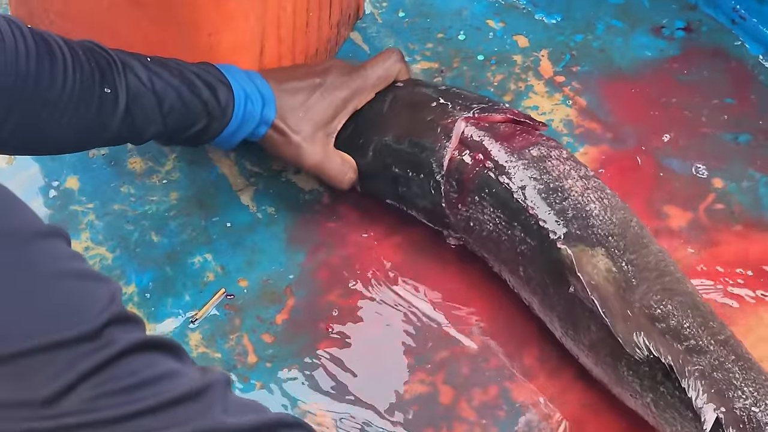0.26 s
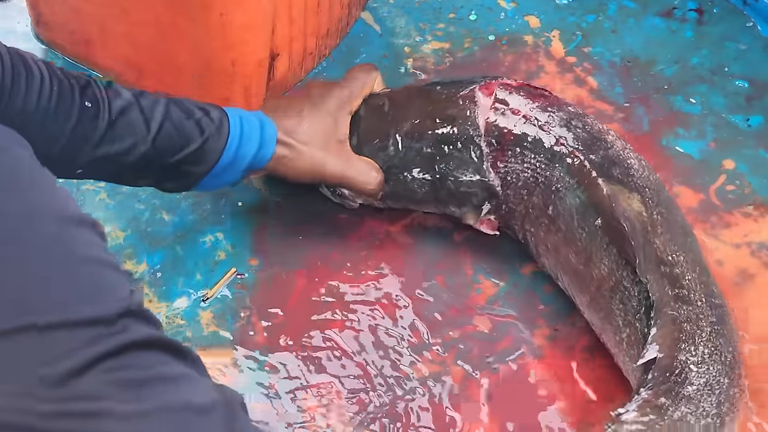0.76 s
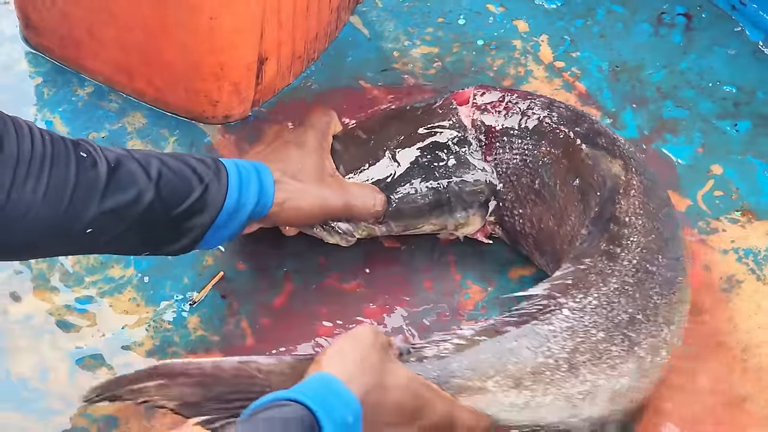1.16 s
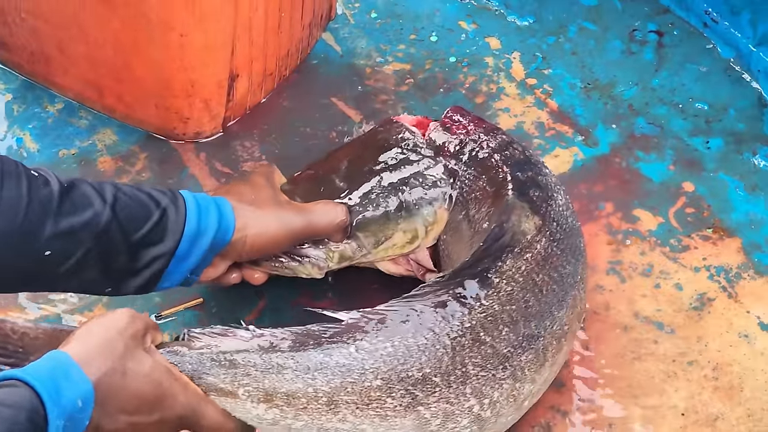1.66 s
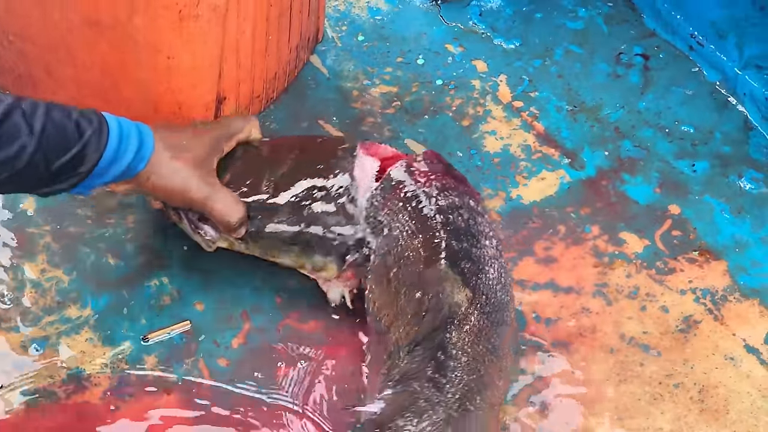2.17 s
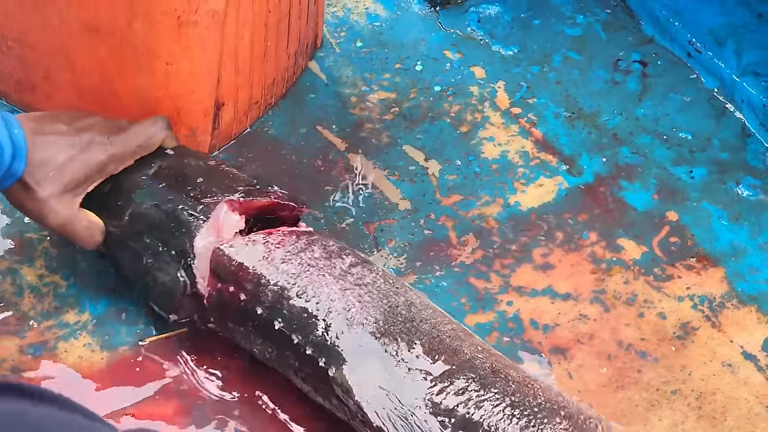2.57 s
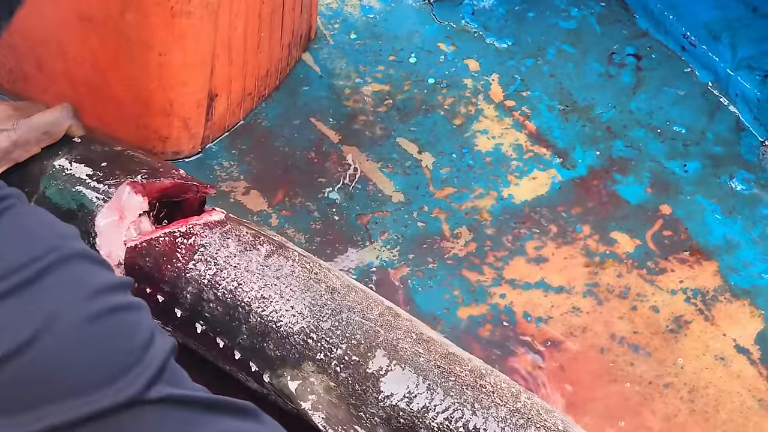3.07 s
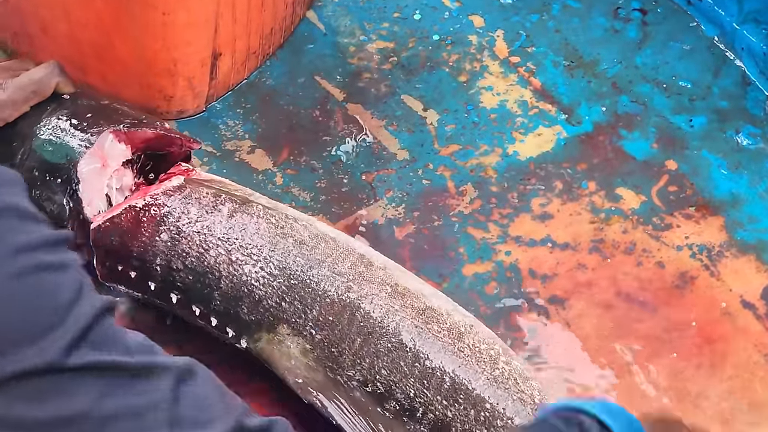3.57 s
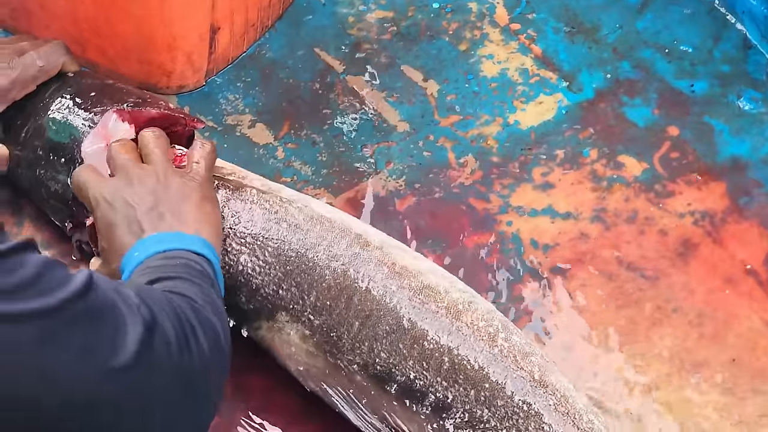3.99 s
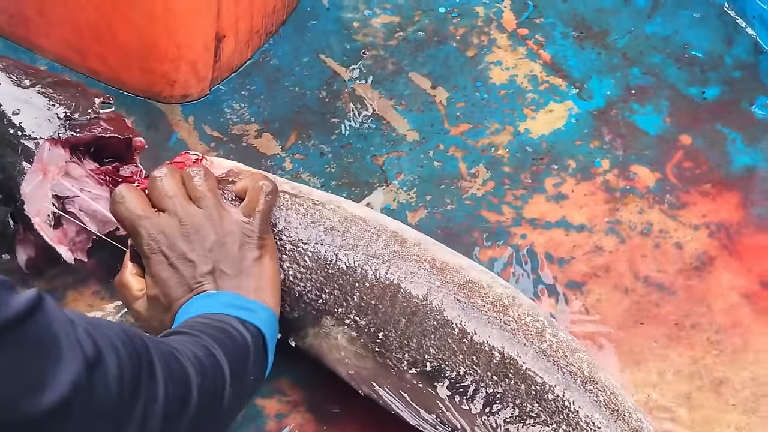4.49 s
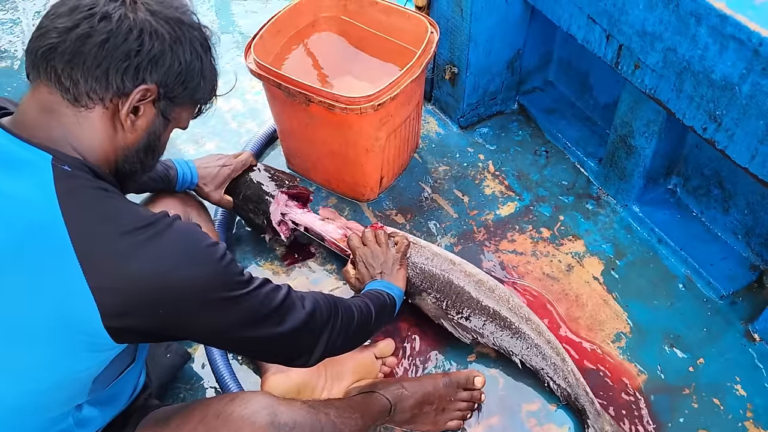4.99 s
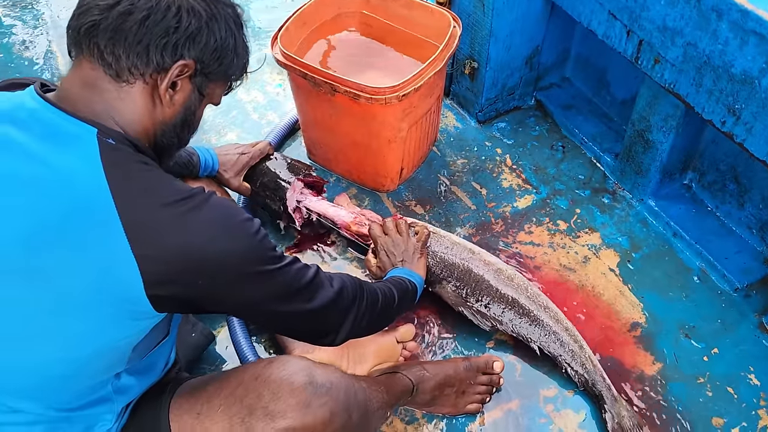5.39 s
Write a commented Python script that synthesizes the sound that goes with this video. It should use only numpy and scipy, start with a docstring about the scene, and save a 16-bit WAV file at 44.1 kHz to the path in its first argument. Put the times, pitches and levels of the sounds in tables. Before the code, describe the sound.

On the wet deck of a fishing boat, a diesel engine throbs steadily with a low hull rumble, a broad roar and a faint whine. The sea hisses softly alongside. A fish dragged through shallow water makes several short splashes early on and a few weaker ones later. The sound cuts out for an instant twice near the end, and the engine then seems further from the stereo microphone.

```python
"""On the wet deck of a fishing boat, a stereo microphone above a steady six-cylinder diesel.
Its firings throb through the rumbling hull, with gear whine, a swelling deck hum and the broad roar of
casing and exhaust. The sea hisses alongside; a fish dragged through the deck water splashes now and then.
The sound drops out briefly twice, and after the second dropout the engine is heard from further off."""
import sys
import numpy as np
from scipy import signal
from scipy.fft import rfft, irfft, next_fast_len
from scipy.io import wavfile

SR = 44100
rng = np.random.default_rng(int(sys.argv[2]) if len(sys.argv) > 2 else 0)


def wav_out(sig):
    """Save sig, one row per channel (or a flat mono array), as 16-bit PCM at SR to the path in sys.argv[1]."""
    wavfile.write(sys.argv[1], SR, np.round(np.clip(np.atleast_2d(sig).T, -1, 1) * 32767).astype(np.int16))


N = 249165

# firings below deck: t/s, firing rate/Hz, levels/dB of harmonics 1, 2 and 3
FIRINGS = [(0, 52.27, -17, -37, -30.5), (0.55, 52.01, -14.5, -29, -24.5), (.95, 52, -17, -25.5, -24.5),
           (1.35, 51.97, -17, -22.5, -21), (1.75, 52.07, -15, -30, -25), (2.4, 52.29, -16, -30.5, -28.5),
           (2.95, 52.29, -16, -29, -29.5), (3.4, 52.31, -15, -32, -26.5), (4.07, 52.29, -16.3, -29, -32),
           (4.73, 52.39, -15.6, -27.5, -28.5), (4.81, 52.02, -22, -33, -30.5),
           (5.25, 51.62, -21, -33, -29.5), (5.65, 52.2, -28, -27, -26)]
# lope of unequal cylinders: multiple of the engine cycle, level near/dB, level further off/dB
LOPE = [(5, -30.5, -40), (8, -39, -49), (9, -30, -30.5), (10, -39, -35), (11, -45, -29), (13, -36, -32),
        (14, -37, -57), (15, -44.5, -43), (16, -38.5, -49), (19, -35, -37.5), (21, -39, -36.5),
        (22, -44, -40.5), (25, -39.5, -55), (27, -37, -37.5), (30, -42.5, -43), (31, -43.0, -36.5),
        (33, -40.5, -42), (34, -42, -43), (36, -45.5, -40.5), (37, -43, -62), (38, -41.5, -61)]
# gear and valve whine: multiple of the engine cycle, level/dB, left over right/dB
GEAR_WHINE = [(42, -47, 0), (48, -45, -2), (50, -46, 0), (54, -47, 2), (62, -47, 0), (66, -48, 3),
              (75, -52, 0), (78, -46, -1), (90, -48, 0), (93, -52, -3), (104, -53, 4), (108, -53, 4),
              (114, -49, -2), (122, -51, -4), (145, -53, -3), (178, -54, -2)]
# how alike a noise is at the two microphones: f/Hz, correlation
MIC_LIKENESS = [(50, 0.69), (150, 0.99), (300, 1), (500, 0.61), (800, 0.24), (1300, 0.15), (3000, 0.016),
                (15000, .02)]
# the side a noise leans to: f/Hz, left over right/dB
MIC_BALANCE = [(60, 2), (400, -0.5), (900, -0.5), (1700, -1.5), (2400, 0), (3300, -3.5), (4000, -2.5),
               (5900, -5), (6600, 2.5), (7400, 3), (9000, 7.5), (11000, -2.5), (13000, -2.5), (15500, -2)]
# noise spectra of hull, deck, casing with exhaust, and sea: f/Hz, relative level/dB
HULL_SPECTRUM = [(15, -22), (24, -8), (32, 3), (42, -8), (60, 2.5), (100, 3.5), (160, -6.5), (250, -6.5),
                 (400, -9), (600, -11), (900, -22)]
DECK_SPECTRUM = [(340, -19), (410, -5), (445, 1.5), (500, -3.5), (580, -25)]
ROAR_SPECTRUM = [(240, -52), (400, -2), (527, -10), (608, -13), (694, -8.5), (925, -10.5), (1180, -11),
                 (1290, -11), (1680, -12.5), (2090, -10.5), (2270, -11.5), (2720, -13.5), (4130, -15),
                 (4770, -16), (7000, -26.5), (9100, -63), (15400, -120)]
SEA_SPECTRUM = [(4120, -6), (7000, -15.5), (7370, -4), (8130, -7), (10700, -6), (11700, 0), (13600, 0),
                (15200, 1.5), (15800, -5.5)]
# swells of the deck hum: peak t/s, level/dB, half-width/s
HUM_SWELLS = [(.8, -35, .35), (1.57, -41, 0.13), (2.376, -32, 0.2), (3.75, -34.5, .15), (5.1, -40, .2)]
# resonances of the engine casing: f/Hz, width/Hz, level over the roar/dB
CASING_MODES = [(640, 40, 3), (820, 60, 2), (1270, 90, 4), (1400, 90, 5), (1550, 30, 2), (1830, 60, 2),
                (2120, 70, 3), (2770, 50, 3), (2930, 80, 2), (3740, 70, 4), (4395, 40, 4), (4700, 120, 2),
                (4880, 60, 3), (5600, 100, 3), (6005, 40, 4), (7350, 120, 3)]
# part of the roar that repeats on every engine cycle: f/Hz, share of the power
ROAR_REPEAT = [(200, 0.6), (500, 0.33), (1200, 0.03), (2500, 0.12), (5000, 0.16)]
# roar and sea around the dropouts: start t/s, roar level/dB, rise/(dB/s), sea level/dB, rise/(dB/s)
BED_LEVELS = [(0, -27.5, .1, -45, 0), (4.1, -29, 5, -46, 5), (4.76, -29, 1, -42.5, -0.3)]
# fish in the deck water: t/s, crack level/dB, smack and spray over crack/dB, decay/s, left over right/dB
FISH_SPLASHES = [(0.67, -25, -12, -12, 0.079, 0), (1.1214, -38, -4, -10.5, .08, -1.5),
                 (1.1654, -37, 0.5, -12, .07, -1), (1.2064, -30, 4, -10, 0.089, 1),
                 (1.2362, -17.5, -2, -8, 0.061, 3), (1.248, -34, -2, -2, 0.15, 0),
                 (1.288, -35, -8, -12, .06, 1.5), (1.4774, -34, -8, -11, .07, 3),
                 (1.6056, -28, 2, -11, 0.07, 1), (1.612, -29, 2, -10, 0.082, 1),
                 (1.8194, -36, -3, -14, .07, -1), (3.5424, -33.5, 3, -1, 0.092, -1),
                 (3.5493, -36.5, -5, -3, 0.092, 4), (5.0324, -38, -5, -2, .07, -4),
                 (5.3874, -37, -5, -8, .07, -3)]
# noise spectra of the three parts of a splash: f/Hz, relative level/dB
SMACK_SPECTRUM = [(700, -18), (1300, -8), (2200, -1.5), (3000, -2), (3900, -1), (4700, -32)]
CRACK_SPECTRUM = [(3600, -19), (4400, -4), (5300, 1.5), (6300, -4.5), (7500, -17), (8500, -30)]
SPRAY_SPECTRUM = [(4410, -37), (7500, -24), (7740, -11), (8820, -11), (11800, 5.5), (13600, -3),
                  (14900, 9.5), (16000, -22)]
# dropouts: t/s, silence/s, fade-in/s
GAPS = [(4.0784, 0.043, 0.027), (4.7336, 0.041, 0.038)]

CYLINDERS = 6
HULL_DB, HUM_REST_DB = -26.5, -47
ROAR_RIPPLE_DB, RIPPLE_SPACING_HZ = 1.3, 12   # a fine random ripple roughens the roar's spectrum
SPLASH_RISE_S = 0.0028
RIGHT_LAG_S = 0.00021   # the engine reaches the left microphone first
CUTOFF_HZ = 15900
SIDES = np.array([[1], [-1]])   # left, right


def from_db(db):
    """Gain of a level in dB."""
    return 10 ** (np.asarray(db) / 20)


def rms_one(x):
    """Scale to rms 1."""
    return x / np.sqrt(np.mean(x ** 2) + 1e-20)


def in_time(rows):
    """Columns of a curve table, sample by sample."""
    times, *columns = np.transpose(rows)
    return [np.interp(np.arange(N) / SR, times, column) for column in columns]


def at_hz(points, hz):
    """Read a spectrum on a log-frequency axis."""
    points_hz, values = np.transpose(points)
    return np.interp(np.log(hz), np.log(points_hz), values)


def drift(rate):
    """Random curve of spread 1, wandering about rate times a second."""
    hop = 40
    pole = np.exp(-2 * np.pi * rate * hop / SR)
    slow = signal.lfilter([1], [1, -2 * pole, pole ** 2], rng.standard_normal(N // hop + 2002))[2000:]
    return np.interp(np.arange(N) / hop, np.arange(len(slow)), rms_one(slow))


def stereo_noise(spectrum, waver_db, cycle=None):
    """Noise at the microphones, rms 1. Given the engine's cycle count, it partly repeats and rings."""
    size = next_fast_len(N)
    hz = np.maximum(np.arange(size // 2 + 1) * SR / size, 1)
    mid, side = rfft(rng.standard_normal((2, size)))
    colour_db = at_hz(spectrum, hz)
    if cycle is not None:
        cycle_samples = round(N / cycle[-1])
        one_cycle = rng.standard_normal((2, cycle_samples))
        looped = rfft(one_cycle[:, (cycle % 1 * cycle_samples).astype(int)], size)
        share = at_hz(ROAR_REPEAT, hz)
        mid, side = np.sqrt(1 - share) * [mid, side] + np.sqrt(share) * looped
        colour_db += sum(db / (1 + (2 * (hz - f) / width) ** 2) for f, width, db in CASING_MODES)
        ripple_hz = np.arange(0, SR / 2, RIPPLE_SPACING_HZ)
        colour_db += ROAR_RIPPLE_DB * np.interp(hz, ripple_hz, rng.standard_normal(SR)[:len(ripple_hz)])
    alike = at_hz(MIC_LIKENESS, hz)
    pair = np.sqrt(1 + alike) * mid + np.sqrt(1 - alike) * side * SIDES
    pair *= from_db(colour_db + SIDES * at_hz(MIC_BALANCE, hz) / 2)
    noise, together = 0, 1.02 * drift(1.35)   # overlapping octave bands waver partly together
    for octave in range(int(np.log2(spectrum[0][0])), int(np.log2(spectrum[-1][0])) + 2):
        band = np.clip(1 - abs(np.log2(hz) - octave), 0, 1)
        noise = noise + from_db(waver_db * (together + drift(3.3))) * irfft(pair * band, size)[:, :N]
    return rms_one(noise)


def bed_levels():
    """Roar and sea in dB: a start level and a steady slope in each stretch."""
    t, rows = np.arange(N) / SR, np.array(BED_LEVELS)
    stretch = np.maximum(np.searchsorted(rows[:, 0], t) - 1, 0)
    start_s, roar_db, roar_rise, sea_db, sea_rise = rows[stretch].T
    return roar_db + roar_rise * (t - start_s), sea_db + sea_rise * (t - start_s)


def diesel():
    """Firing harmonics peak together in a pulse, cylinders lope, gears whine; also gives the cycle count."""
    firing_hz, first_db, second_db, third_db = in_time(FIRINGS)
    cycle = np.cumsum(firing_hz) / SR / CYLINDERS
    phase = 2 * np.pi * cycle
    throb = from_db(first_db + 0.81 * drift(3.1)) * np.cos(CYLINDERS * phase)
    for harmonic, db in [(2, second_db), (3, third_db), (4, first_db - 15.5)]:
        throb = throb + from_db(db + drift(2.0)) * np.cos(harmonic * CYLINDERS * phase)
    further_off = np.arange(N) / SR > GAPS[1][0]
    for multiple, near_db, far_db in LOPE:
        level = from_db(np.where(further_off, far_db, near_db) + 1.6 * drift(5.4))
        throb = throb + level * np.cos(multiple * phase + rng.uniform(0, 2 * np.pi))
    for multiple, db, pan_db in GEAR_WHINE:
        level = from_db(db + SIDES * pan_db / 2 + 1.5 * drift(1.2))
        throb = throb + level * np.cos(multiple * phase + rng.uniform(0, 2 * np.pi))
    sway = from_db(SIDES * (0.02 + 0.37 * drift(3.9)))   # the throb leans from side to side
    return np.sqrt(2) * sway * throb, cycle


def hull_rumble():
    """The hull rumbles low beneath the microphone."""
    return from_db(HULL_DB) * stereo_noise(HULL_SPECTRUM, waver_db=0.7)


def engine_roar(level_db, cycle):
    """Exhaust and ringing casing roar, partly alike on every engine cycle."""
    return from_db(level_db) * stereo_noise(ROAR_SPECTRUM, waver_db=0.5, cycle=cycle)


def sea_wash(level_db):
    """Water washes along the hull with a high, flickering hiss."""
    return from_db(level_db + 0.74 * drift(60)) * stereo_noise(SEA_SPECTRUM, waver_db=1.37)


def deck_hum():
    """A narrow band of noise in the deck underfoot swells and sinks smoothly."""
    t = np.arange(N) / SR
    swells = sum(from_db(2 * db) * np.exp(-((t - peak_s) / half_s) ** 2) for peak_s, db, half_s in HUM_SWELLS)
    power = from_db(2 * HUM_REST_DB) + swells
    return np.sqrt(power) * stereo_noise(DECK_SPECTRUM, waver_db=0.7)


def fish_splashes():
    """The fish slaps the deck water: a dull smack, a bright crack and spray that lasts a little longer."""
    t, envelopes = np.arange(N) / SR, np.zeros((3, 2, N))
    for start_s, crack_db, smack_db, spray_db, decay_s, pan_db in FISH_SPLASHES:
        age = np.maximum(t - start_s, 0)
        burst = from_db(crack_db + SIDES * pan_db / 2) * np.minimum(age / SPLASH_RISE_S, 1)
        decays = np.maximum(age - SPLASH_RISE_S, 0) / decay_s
        envelopes[0] += burst * from_db(smack_db - 60 * decays)
        envelopes[1] += burst * from_db(-60 * decays)
        envelopes[2] += burst * from_db(spray_db - 53 * decays)
    noises = [stereo_noise(part, waver_db=0) for part in (SMACK_SPECTRUM, CRACK_SPECTRUM, SPRAY_SPECTRUM)]
    patter = from_db(1.2 * drift(300))
    return patter * (envelopes * noises).sum(axis=0)


def scene():
    """From the deck: engine and boat reach the left microphone first; sea and splashes lie over them."""
    throb, cycle = diesel()
    roar_db, sea_db = bed_levels()
    boat = throb + hull_rumble() + engine_roar(roar_db, cycle)
    sea = sea_wash(sea_db)
    left, right = boat + deck_hum()
    right = np.roll(right, round(RIGHT_LAG_S * SR))
    return np.array([left, right]) + sea + fish_splashes()


def record(dry):
    """The microphone signal drops out abruptly twice and fades back in; the highest treble is cut."""
    t, gate = np.arange(N) / SR, np.ones(N)
    for start_s, silence_s, fade_s in GAPS:
        recovery = np.clip((t - start_s - silence_s) / fade_s, 0, 1)
        gate *= np.where(t < start_s, 1, np.sin(np.pi / 2 * recovery) ** 2)
    lowpass = signal.ellip(12, .5, 80, CUTOFF_HZ, fs=SR, output="sos")
    return signal.sosfilt(lowpass, gate * dry)


dry = scene()
out = record(dry)
wav_out(out)
```